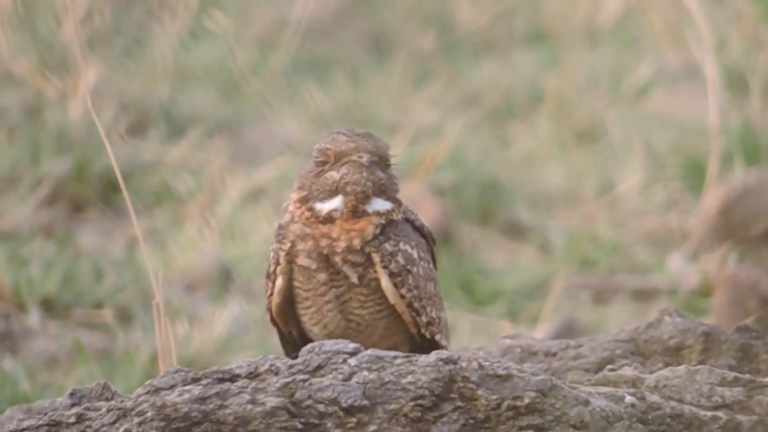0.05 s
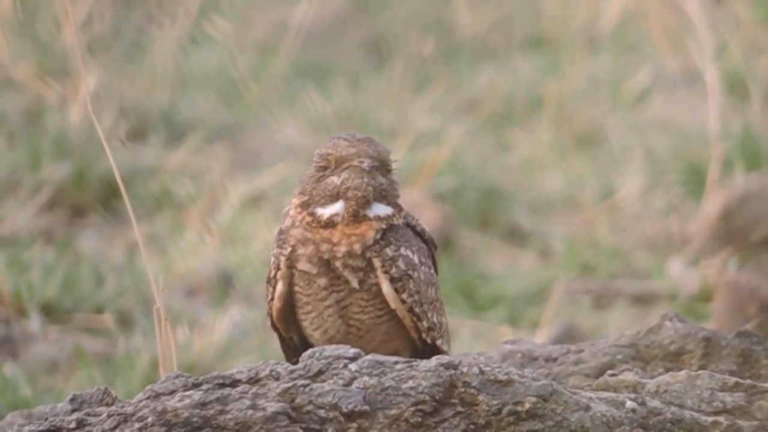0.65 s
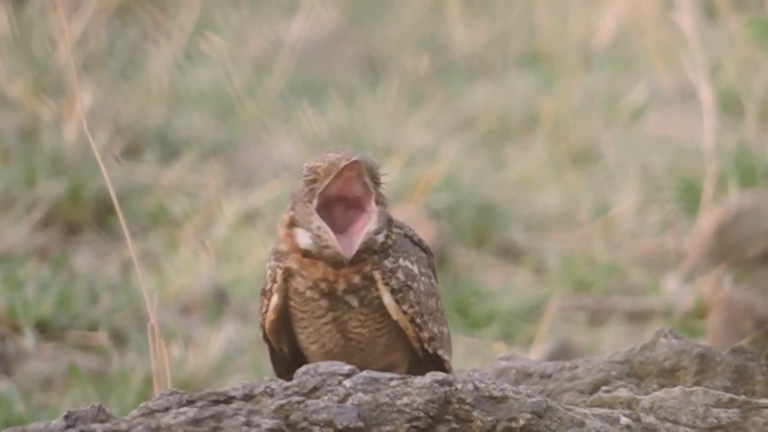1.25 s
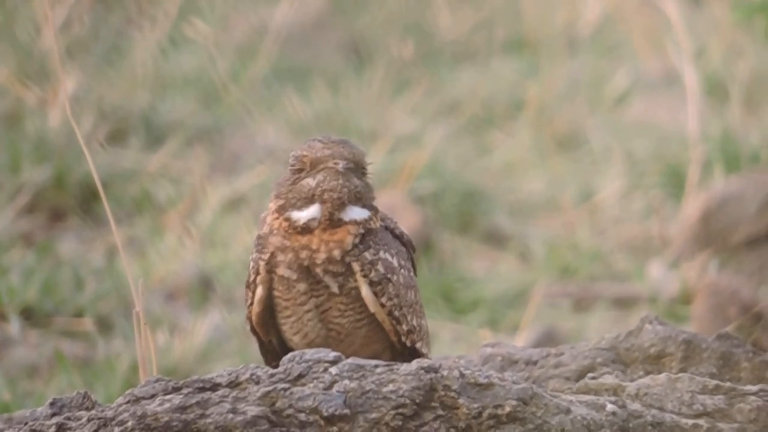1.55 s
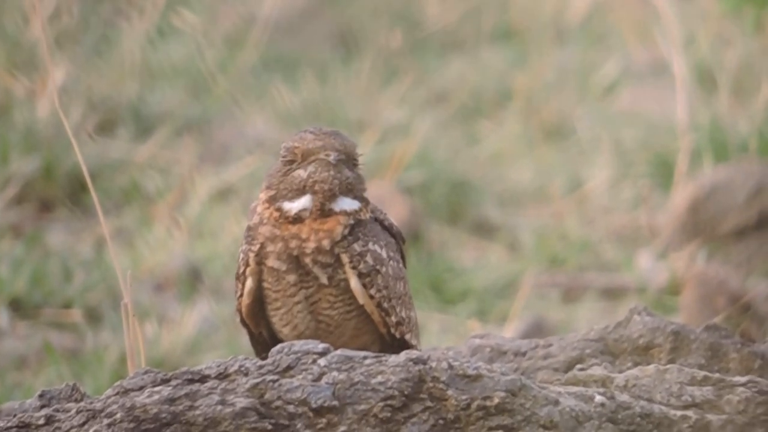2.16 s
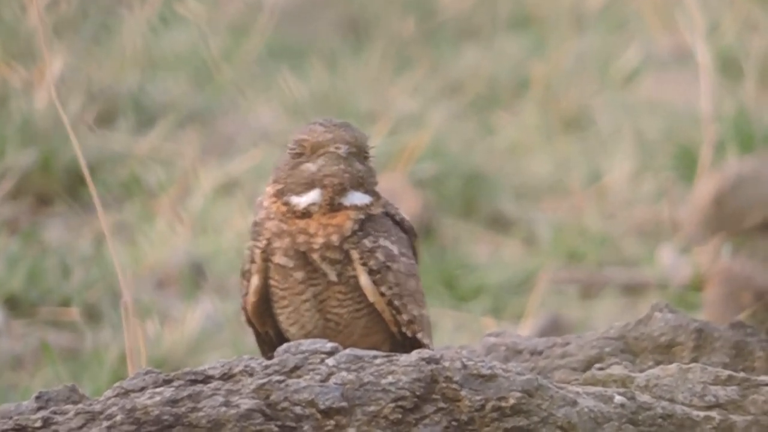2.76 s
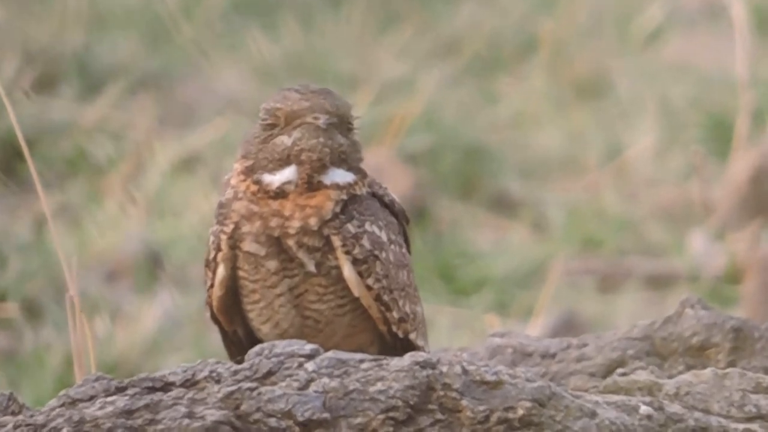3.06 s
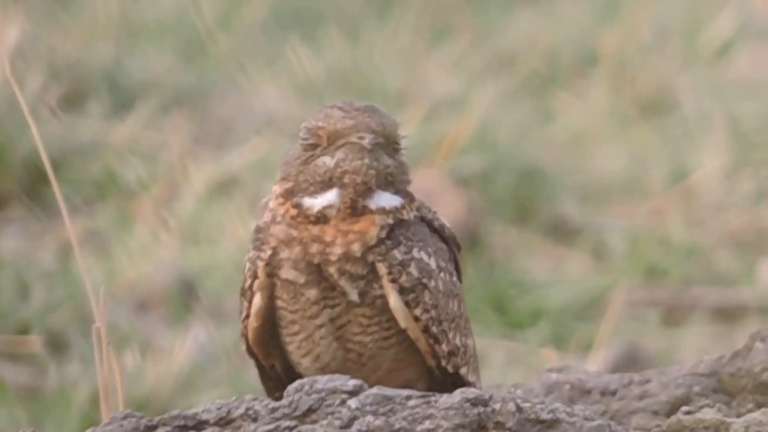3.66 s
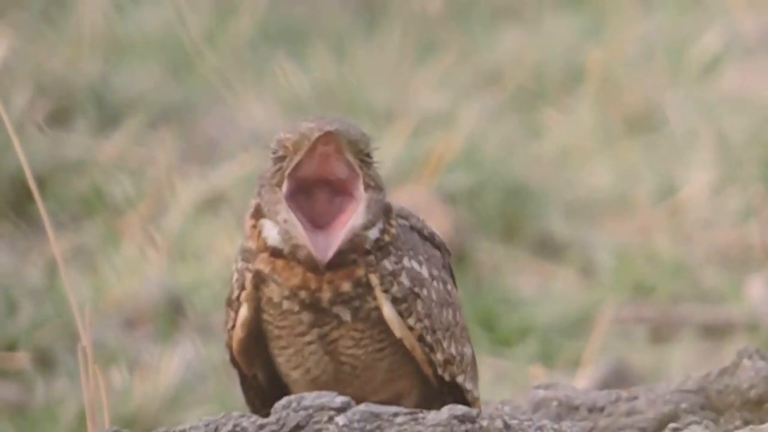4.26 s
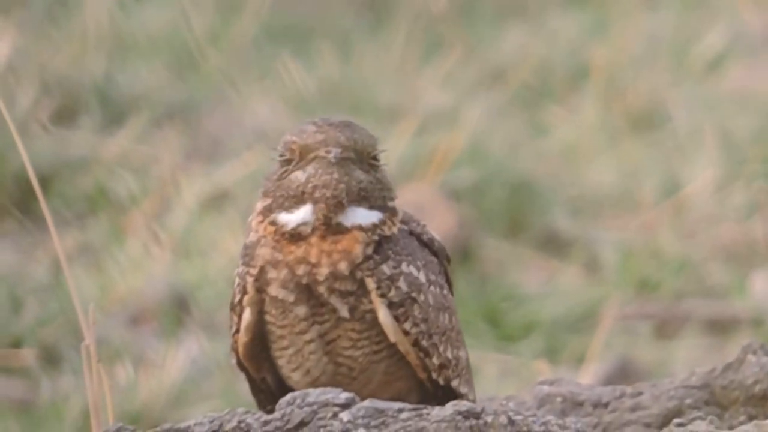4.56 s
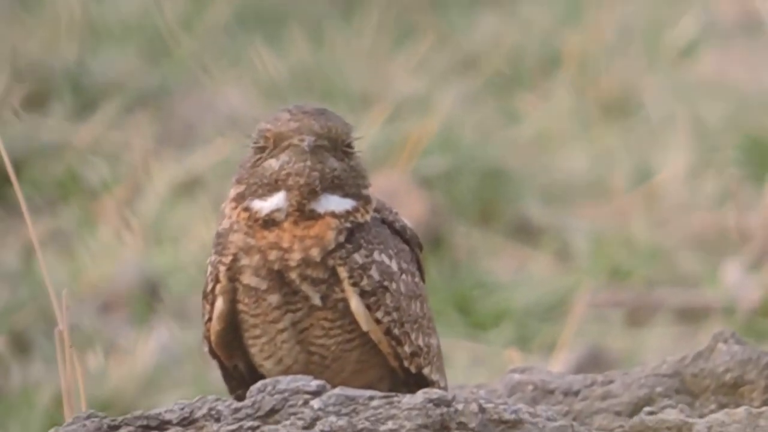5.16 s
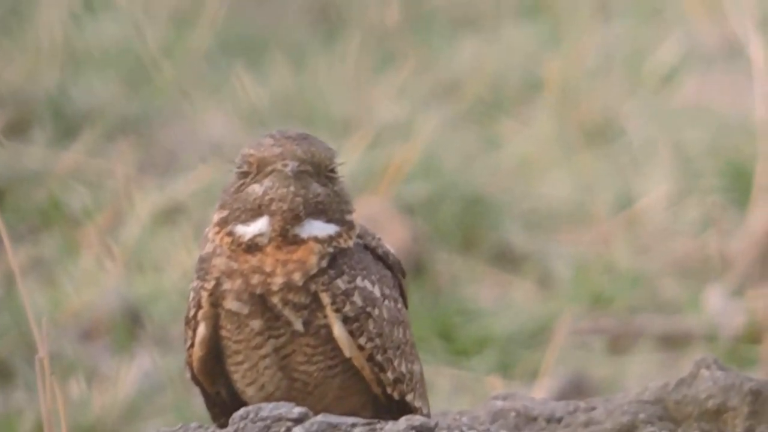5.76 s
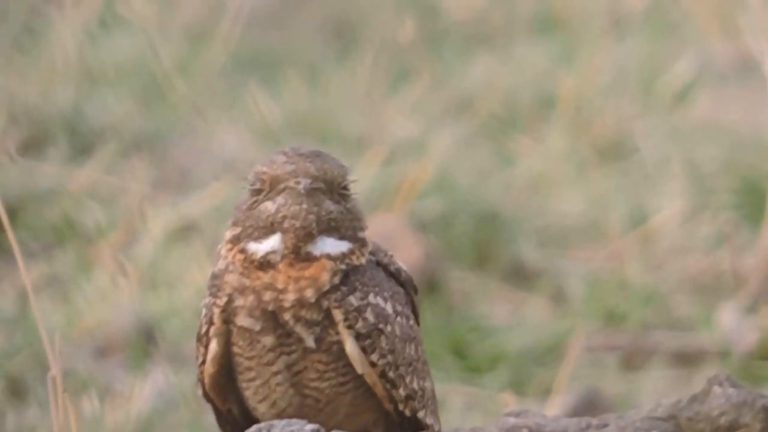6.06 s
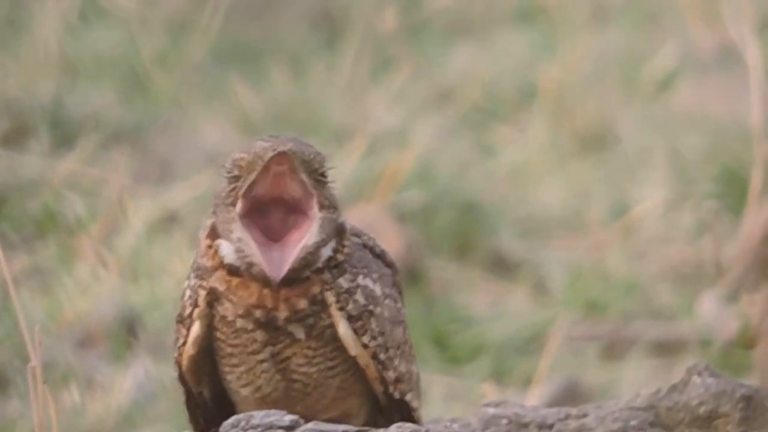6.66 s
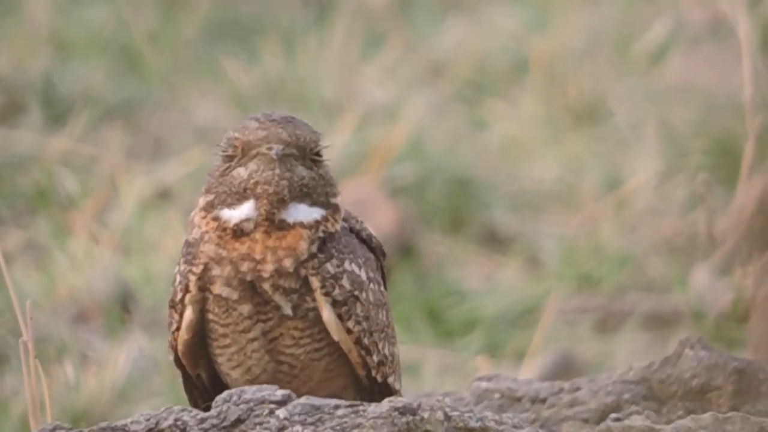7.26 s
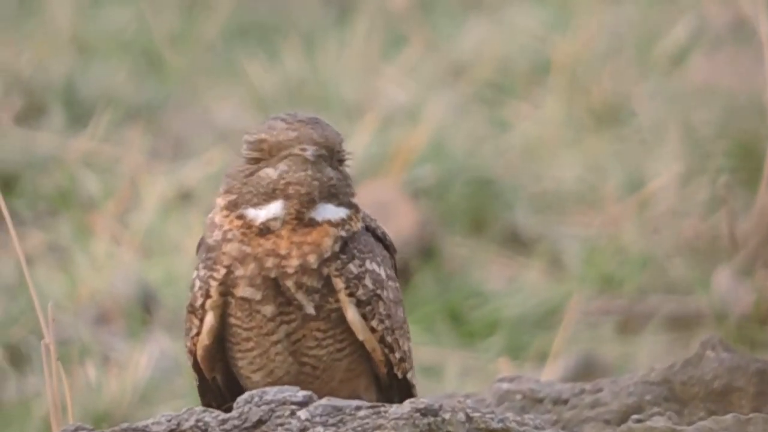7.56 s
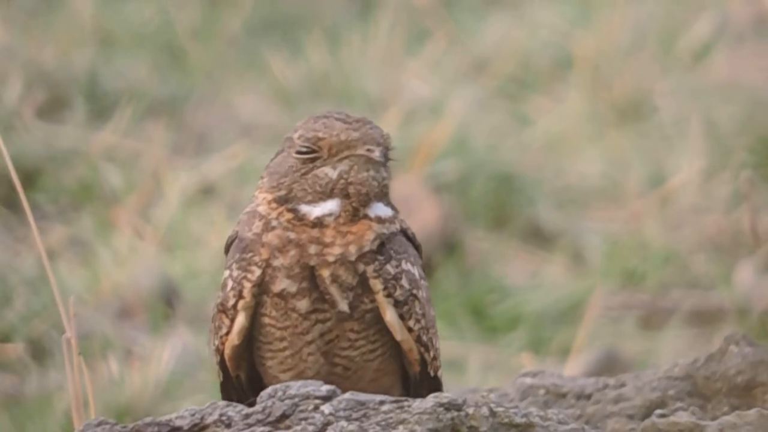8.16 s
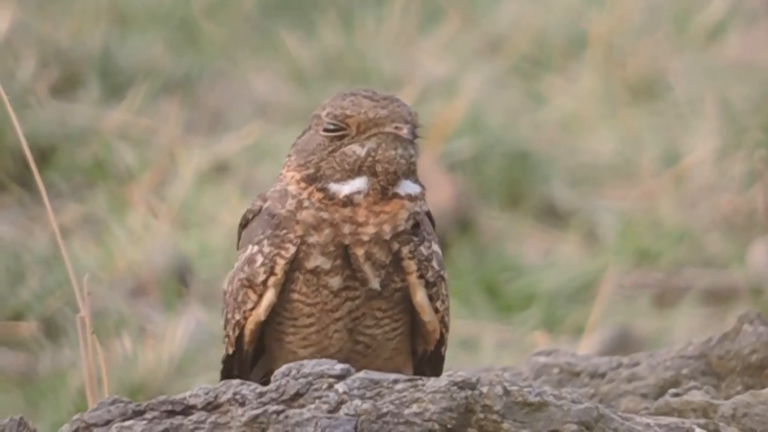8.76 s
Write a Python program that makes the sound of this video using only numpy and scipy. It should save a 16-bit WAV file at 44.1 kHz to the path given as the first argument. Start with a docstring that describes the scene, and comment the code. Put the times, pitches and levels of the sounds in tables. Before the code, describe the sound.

Two birds trade short, harsh trilled calls, one close and loud, one far off, while small birds chirp faintly in open country.

```python
"""Over the low rumble and thin hiss of open country, a far nightjar calls faintly and a near one on a
rock follows, loud and harsh; they trade three calls each. A call is one whistle shaken by a fast trill,
ending in a clean swoop. From about two seconds distant small birds chirp and buzz more busily, and just
after three something clicks close by. At the end a puff of wind swells into a low buffeting."""
import sys
import numpy as np
from scipy import signal
from scipy.fft import rfft, irfft
from scipy.io import wavfile
from scipy.ndimage import uniform_filter1d

SR = 44100
rng = np.random.default_rng(int(sys.argv[2]) if len(sys.argv) > 2 else 0)


def to_wav(s):
    """Save 16-bit WAV."""
    ch = np.atleast_2d(s).T  # columns
    pcm = np.round(np.clip(ch, -1, 1) * 32767)  # PCM
    wavfile.write(sys.argv[1], SR, pcm.astype(np.int16))


N = 396900
TIME = np.arange(N) / SR


def nightjar(calls, drive, overtones, opening, lag, gape_s, trill_hz, trill_depth, jitter_hz,
             hiss_db, throb, throb_lead, skew):
    """One whistle with overtones; a fast trill swings its pitch and loudness and makes it harsh."""
    out = np.zeros(N)
    for start, level_db, length, key_hz in calls:
        t = np.arange(0, length, 1 / SR)
        pitch, trilled = call_melody(t / length, opening, lag)
        centre_hz = key_hz * pitch
        depth_hz = trill_depth * centre_hz * trilled
        harsh = depth_hz / depth_hz.max()  # 0 in the clean swoop
        effort_db, bright_db = drive(t, centre_hz, trilled)
        trill = phase_of(trill_hz * (1 - .25 * t + .02 * wander(len(t), 60)))  # slows a little
        swing = np.sin(trill - skew * np.sin(trill))  # climbs more slowly than it falls
        hz = centre_hz + depth_hz * swing + jitter_hz * (.28 + harsh) * wander(len(t), 1500)
        phase = phase_of(hz)
        gape = np.minimum(t / gape_s, 1) ** 2  # the opening bill lets the top overtones out
        upper = np.zeros(len(t))
        for k, db in enumerate(overtones, 2):
            cut_db = 11 * np.maximum(5850 - k * hz, 0) / 1000  # the throat holds back low overtones
            upper += amp(db - cut_db) * gape ** (k - 2) * np.sin(k * phase) * (k * hz < SR / 2)
        upper *= amp(-.8 * harsh * swing)  # brightest at the bottom of each swing
        high_noise = signal.lfilter([1, -1], [1], rng.standard_normal(len(t)))
        hiss = high_noise * harsh * amp(hiss_db + .33 * bright_db)
        beat = 1 + throb * harsh * np.sin(trill + throb_lead)
        voice = np.sqrt(2) * beat * (np.sin(phase) + amp(bright_db) * upper + hiss)
        add(out, start, amp(level_db + effort_db) * voice * signal.windows.tukey(len(t), .012))
    return out


# The trilled scoop, then the clean swoop. Each row: share of the call, pitch as a ratio to the key.
SCOOP = [(.028, .83), (.085, .68), (.165, .595), (.36, 0.76), (.46, .812), (.72, .875)]
SWOOP = [(.72, 1.07), (.75, 1.132), (.782, 1.135), (.87, .752), (.9, .752), (.952, 1.04), (1.03, .9)]
def call_melody(u, opening, lag):
    """Opening note, scoop and swoop: the pitch relative to the key, and where it is trilled (0-1)."""
    scoop_at, scoop = np.transpose(SCOOP)
    swoop_at, swoop = np.transpose(SWOOP)
    turns = np.arange(len(swoop))
    turn = np.interp(u, swoop_at, turns)
    eased = np.floor(turn) + .5 - .5 * np.cos(np.pi * (turn % 1))  # lingers at each turning point
    trilled = (u >= scoop_at[0]) & (u < swoop_at[0])
    late = swoop_at[0] * (u / swoop_at[0]) ** lag  # a lag over 1 puts off the dip of the scoop
    pitch = np.where(trilled, np.interp(late, scoop_at, scoop), np.interp(eased, turns, swoop))
    pitch[u < scoop_at[0]] = opening
    return uniform_filter1d(pitch, size=110), uniform_filter1d(trilled * 1., size=110)


def push(t, centre_hz, trilled, full_hz, full_db, dull_db_per_khz, pure_db_per_khz, loud_db_per_khz,
         clean_db, onset_db, onset_bright_db, attack_s, release_db, release_s):
    """Effort and brightness in dB: the voice is richest at one pitch, duller below, purer above."""
    khz = (centre_hz - full_hz) / 1000
    onset = np.maximum(1 - t / attack_s, 0)
    ending = np.maximum(1 - (t[-1] - t) / release_s, 0)
    effort_db = loud_db_per_khz * khz + clean_db * (1 - trilled) + onset_db * onset + release_db * ending
    rich_db = full_db + dull_db_per_khz * np.minimum(khz, 0) - pure_db_per_khz * np.maximum(khz, 0)
    return effort_db, rich_db + onset_bright_db * onset


def near_push(t, centre_hz, trilled):
    """Swells quickly, holds and drops away at the very end; the clean notes are the brighter ones."""
    effort_db, bright_db = push(
        t, centre_hz, trilled, full_hz=3708, full_db=-2.5, dull_db_per_khz=21.5, pure_db_per_khz=4.5,
        loud_db_per_khz=-.2, clean_db=-1.5, onset_db=-7, onset_bright_db=8, attack_s=.02,
        release_db=-12, release_s=.006)
    return effort_db, bright_db + 4 * (1 - trilled)


# The lead calls. Each row: start in seconds, level in dB, length in seconds, key pitch in Hz.
NEAR_CALLS = [(1.2522, -22.5, .241, 4546), (4.2478, -21, .240, 4585), (6.6775, -22, .243, 4600)]
# The balance of the second, third and fourth harmonics in dB.
NEAR_OVERTONES = [1, -3, -13.5]
# The colour of throat and gape. Each row: frequency in Hz, gain in dB.
NEAR_THROAT = [(1200, -7), (2050, -8.5), (2500, -4.5), (3400, -5), (4000, 1), (4700, -5), (5200, -1),
               (5750, -3), (6450, -6), (8000, -5), (9200, -3), (11200, -5), (13000, -6), (15000, -18.5)]
# Peaks and dips on each side. Each row: centre in Hz, width in Hz, gain in dB.
LEFT_PEAKS = [(4022, 490, 13), (3380, 430, 5.5), (6000, 1900, 8.5), (8350, 200, -13.5), (10930, 1530, 13)]
RIGHT_PEAKS = [(5200, 490, 5.8), (3400, 230, 0.62), (9100, 1200, 1)]
def near_nightjar():
    """Faces the listener; rock and grass answer at once, the field faintly and for longer."""
    voice = nightjar(NEAR_CALLS, near_push, NEAR_OVERTONES, opening=.98, lag=.96, gape_s=.008,
                     trill_hz=198.3, trill_depth=.15, jitter_hz=36, hiss_db=-16.5,
                     throb=.22, throb_lead=-1.477, skew=.15)
    direct = np.array([colour(voice, NEAR_THROAT, peaks) for peaks in (LEFT_PEAKS, RIGHT_PEAKS)])
    spread = colour(voice, NEAR_THROAT)
    ground = scatter(spread, [(3000, .09), (12000, .094)], delay_s=.001)
    return direct + amp(-3) * ground + amp(-24) * field_echo(spread, delay_s=.02)


def far_push(t, centre_hz, trilled):
    """Grows louder as the pitch climbs and leans into the ending."""
    return push(t, centre_hz, trilled, full_hz=3630, full_db=-6.5, dull_db_per_khz=11,
                pure_db_per_khz=2, loud_db_per_khz=2, clean_db=-2, onset_db=-1, onset_bright_db=4,
                attack_s=.015, release_db=5, release_s=.022)


# The faint calls. Each row: start in seconds, level in dB, length in seconds, key pitch in Hz.
FAR_CALLS = [(0.6015, -36.5, 0.19, 4390), (2.8825, -38, 0.2, 4377), (5.8222, -39.5, .198, 4370)]
# The balance of the second, third and fourth harmonics in dB.
FAR_OVERTONES = [-2.5, -2, -16]
# A duller throat and gape. Each row: frequency in Hz, gain in dB.
FAR_THROAT = [(1200, -32), (2300, -3.5), (3200, -3), (4950, -2), (5350, -12), (6100, -0.5), (7200, -6.5),
              (9500, -3.5), (11000, -9.5), (13000, -33)]
def far_nightjar():
    """Off to the left, duller and more blurred by echoes."""
    voice = nightjar(FAR_CALLS, far_push, FAR_OVERTONES, opening=1.04, lag=1.16, gape_s=.011,
                     trill_hz=208.3, trill_depth=.18, jitter_hz=100, hiss_db=-26,
                     throb=.2, throb_lead=-1.05, skew=.25)
    voice = colour(voice, FAR_THROAT)
    direct = np.array([amp(5) * voice, amp(-1.5) * np.roll(voice, shift=6)])  # later on the right
    ground = scatter(voice, [(3000, .12), (12000, .25)], delay_s=.001)
    return direct + amp(-1.5) * ground + amp(-16) * field_echo(voice, delay_s=.024)


# Close clicks. Each row: start in seconds, level in dB, decay in seconds, ring send in dB.
CLICKS = [(3.0552, -24.5, 0.00042, -56), (3.221, -22.5, 0.00091, -16.5), (3.2227, -30, 0.0015, -36),
          (3.2438, -34, 0.0014, -20)]
# Their dull ring. Each row: frequency in Hz, gain in dB, seconds to fall 60 dB.
CLICK_MODES = [(390, -5, 0.054), (704, -9, 0.03), (914, 14.5, 0.011), (1220, 10.5, 0.007), (1690, -10, .02),
               (3670, -4, 0.019)]
# The tone of the crack. Each row: frequency in Hz, gain in dB.
CRACK_EQ = [(200, -11), (1000, 0), (4500, 2.5), (8000, 0.5), (12000, -7.5), (16000, -11)]
def clicks():
    """Each is a short crack of noise with a quickly damped ring, to the left."""
    t = TIME[:SR // 10]
    cracks, rings = np.zeros((2, N))
    body = sum(amp(db - 60 * t / t60) * np.sin(2 * np.pi * hz * t) for hz, db, t60 in CLICK_MODES)
    for start, db, decay, ring_db in CLICKS:
        add(cracks, start, amp(db) * np.exp(-t / decay) * rng.standard_normal(len(t)))
        add(rings, start, amp(db + ring_db) * body)
    direct = colour(cracks, CRACK_EQ) + rings
    echoes = scatter(direct, [(500, .05), (8000, .043)], delay_s=.001)
    return direct * amp([[3], [-5]]) + amp(-3) * echoes


def small_birds():
    """A chorus from across the field, leaning left and blurred by echoes."""
    chorus = np.zeros(N)
    for song in (buzzes, scratches, slurs, whistles, seees, peeps, churr_piks, twitter):
        for start, note in song():
            add(chorus, start, note)
    blur = scatter(chorus, [(2000, .052), (8000, .037)], delay_s=.003)
    echoes = amp(-1.5) * blur + amp(-9.5) * field_echo(chorus, delay_s=.037)
    return chorus * amp([[-.5], [-4.5]]) + echoes * amp([[1], [-1]])


def chirp(length, first_hz, middle_hz, last_hz, db, rasp_hz, flutter_hz=125):
    """A whistle on an arc of pitch; a fast, uneven flutter of the pitch turns it into a buzz."""
    u = np.linspace(0, 1, max(int(length * SR), 64))
    flutter = np.sin(phase_of(flutter_hz * (1 + .18 * wander(len(u), 60))))
    arc_hz = np.polyval(np.polyfit([0, .5, 1], [first_hz, middle_hz, last_hz], 2), u)
    hz = arc_hz + rasp_hz * (flutter + .595 * wander(len(u), 900))
    return amp(db) * np.sqrt(2) * np.sin(phase_of(hz)) * signal.windows.tukey(len(u), .35)


def crackly(length, first_hz, last_hz, db, spike_hz, spikes_per_s, crest, spread, fade_db):
    """A gliding whistle broken by a few sharp upward flicks of pitch, strongest at the crest."""
    u = np.linspace(0, 1, int(length * SR))
    turns = np.cumsum(spikes_per_s * (1 + .096 * wander(len(u), 80))) / SR + rng.random()
    flicks = (np.sin(np.pi * turns) ** 4 - .3) * np.exp(-((u - crest) / spread) ** 2)
    hz = first_hz + (last_hz - first_hz) * u + spike_hz * flicks
    envelope = amp(db + fade_db * abs(u - crest)) * signal.windows.tukey(len(u), .1)
    return envelope * np.sqrt(2) * np.sin(phase_of(hz))


# Each row: start of the pik in seconds, pik level in dB, churr level in dB, key pitch in Hz.
CHURR_PIKS = [(3.129, -52, -59, 2250), (4.143, -42.5, -54, 2500), (4.523, -47, -55.5, 2350),
              (4.699, -53.5, -59.5, 2200), (4.894, -56, -61, 2170), (5.199, -48, -57, 2216),
              (5.357, -44.5, -53, 2260), (5.522, -44.5, -52.5, 2260), (5.71, -44.5, -54, 2280)]
def churr_piks():
    """A falling, crackly churr runs into a short, sharp pik."""
    for start, pik_db, churr_db, hz in CHURR_PIKS:
        yield start - .073, crackly(.066, .94 * hz, .66 * hz, churr_db, spike_hz=850,
                                    spikes_per_s=130, crest=.408, spread=.26, fade_db=-9)
        yield start + .00096, crackly(.0198, 1.02 * hz, .97 * hz, pik_db, spike_hz=480,
                                      spikes_per_s=210, crest=.14, spread=.24, fade_db=-14.5)


# Each row: start in seconds, pitch in Hz, level in dB.
PEEPS = [(1.835, 2080, -60.5), (3.28, 2160, -57), (3.64, 2725, -56.5), (3.722, 2260, -55.5),
         (3.809, 2134, -53), (3.865, 2386, -55.5), (3.946, 2074, -53.5), (5.02, 2126, -54.5)]
def peeps():
    """Soft, arched peeps that lead up to the churr-piks."""
    for start, hz, db in PEEPS:
        yield start, chirp(.036, .92 * hz, hz, .976 * hz, db, rasp_hz=86.3)


# Each row: start in seconds, length in seconds, level in dB.
BUZZES = [(3.824, .125, -58.5), (4.153, 0.14, -54), (4.477, 0.12, -50.5), (4.745, 0.16, -51.5),
          (5.045, .135, -49.5), (8.778, 0.11, -59)]
def buzzes(hz=4850, rise=.05, tick_s=.011):
    """Rising buzzes, each ending in a tick."""
    top_hz = hz * (1 + rise)
    for start, length, db in BUZZES:
        yield start, chirp(length, hz * (1 - rise), hz, top_hz, db, rasp_hz=314)
        tick = chirp(tick_s, top_hz, 1.03 * top_hz, .915 * top_hz, db + 3, rasp_hz=115)
        yield start + length - tick_s / 2, tick


# Each row: start in seconds, length in seconds, pitch in Hz, level in dB.
SCRATCHES = [(2.416, .29, 2933, -64), (3.364, 0.089, 3830, -55), (3.365, .17, 5700, -62.5),
             (4.89, 0.2, 5400, -55), (4.875, 0.22, 3590, -62.5), (5.192, 0.11, 5570, -56),
             (6.277, .12, 3268, -59.5), (7.363, 0.18, 3670, -61), (7.963, 0.15, 5600, -65.5)]
def scratches(depth=.145):
    """Hoarse notes that flutter around a level pitch, with an airy octave on top."""
    for start, length, hz, db in SCRATCHES:
        yield start, chirp(length, hz, hz, hz, db, depth * hz, flutter_hz=92)
        yield start, chirp(length, 2 * hz, 2 * hz, 2 * hz, db - 14.5, 2 * depth * hz, flutter_hz=90)


# Each row: start and length in seconds, first and last pitch in Hz, level in dB.
SLURS = [(2.179, 0.038, 5670, 3610, -63.5), (3.527, .036, 4620, 3800, -58.5),
         (5.383, 0.062, 5840, 4470, -59.5), (6.405, 0.13, 3230, 2070, -60),
         (7.047, 0.086, 2000, 4600, -60.5), (7.195, .076, 1994, 4600, -62), (8.161, 0.083, 5870, 4470, -63),
         (8.9, 0.065, 4300, 2660, -62.5)]
def slurs():
    """Quick, husky slides up or down."""
    for start, length, first_hz, last_hz, db in SLURS:
        yield start, chirp(length, first_hz, np.sqrt(first_hz * last_hz), last_hz, db, rasp_hz=140)


# Each row: start and length in seconds, first, middle and last pitch in Hz, level in dB.
WHISTLES = [(0.0, 0.16, 1086, 1165, 1170, -66.5), (2.755, .072, 2210, 2770, 2940, -64),
            (4.021, .15, 4320, 4210, 3500, -58), (5.215, 0.13, 2800, 3150, 2600, -64),
            (5.64, .23, 880, 1200, 1030, -62.5), (7.654, .19, 3000, 3335, 3740, -59),
            (8.602, 0.076, 3020, 3540, 3110, -58), (8.938, .09, 538, 620, 640, -61)]
def whistles():
    """Clear notes on an arc of pitch."""
    for start, length, *arc_hz, db in WHISTLES:
        yield start, chirp(length, *arc_hz, db, rasp_hz=.011 * length)


# Each row: start in seconds, level in dB.
SEEES = [(2.196, -74), (3.72, -70), (7.25, -74.5)]
def seees():
    """One thin, high, rising "seee", repeated."""
    for start, db in SEEES:
        yield start, chirp(.23, first_hz=6700, middle_hz=7250, last_hz=7650, db=db, rasp_hz=45)


def twitter(per_s=1.7, low_hz=2320, high_hz=5300):
    """Very faint chirps at random times and pitches."""
    for when, height, bend in rng.random((round(per_s * N / SR), 3)):
        hz = low_hz * (high_hz / low_hz) ** height
        first_hz, last_hz = hz * (.87 + .33 * bend), hz * (1 - .22 * bend)
        yield when * N / SR, chirp(.05, first_hz, hz, last_hz, db=-68, rasp_hz=55)


# The closing swell of wind. Each row: time in seconds, level on the right in dB.
WIND_SWELL = [(8.4, -60.5), (8.65, -38), (8.85, -33.5), (9.0, -39)]
def breeze():
    """A puff of wind buffets the microphone, mostly on the right."""
    buffet_eq = [(10, -3), (35, 3.5), (80, 3), (160, -13), (300, -35.5), (800, -51), (3000, -65.5)]
    buffet = np.array([unit(colour(rng.standard_normal(N), buffet_eq)) for _ in range(2)])
    return buffet * amp([[-11], [0]]) * amp(np.interp(TIME, *np.transpose(WIND_SWELL)))


# The tone of the outdoor bed. Each row: frequency in Hz, relative level in dB.
AIR_EQ = [(12, -29.5), (20, -9.5), (60, 0), (241, -18.5), (301, -19), (328, -17), (357, -23), (976, -28.5),
          (1440, -32), (2080, -29.5), (2750, -32.5), (3440, -33.5), (3950, -34), (5530, -35.5),
          (16000, -48)]
# Its stereo width. Each row: frequency in Hz, left-right likeness from 0 to 1.
AIR_LIKENESS = [(60, 0.94), (150, 0.87), (380, 0.4), (950, 0.51), (2380, 0.22), (5980, 0.18), (15000, 0.77)]
# Its lean to the left. Each row: frequency in Hz, left minus right in dB.
AIR_BALANCE = [(60, 2.5), (150, 1.5), (380, 0.5), (950, 5.5), (2380, 1.0), (5980, 0.5), (15000, 0.5)]
def air():
    """Low rumble and thin hiss of open country, drifting a little, with a faint wavering hum."""
    hz = np.fft.rfftfreq(N, 1 / SR)
    left, other = rfft(rng.standard_normal((2, N)))
    likeness = np.clip(read(AIR_LIKENESS, hz), -1, 1)
    right = likeness * left + np.sqrt(1 - likeness ** 2) * other
    gain = amp(read(AIR_EQ, hz) + np.array([[.5], [-.5]]) * read(AIR_BALANCE, hz))
    bed = unit(irfft(np.array([left, right]) * gain, N))
    hum = np.sin(phase_of(331 + 3 * wander(N, 5.3))) * (1 + .86 * wander(N, 5))
    return amp(-47.5) * bed * amp(.5 * wander(N, 3.2)) + amp(-73) * hum


# The tail of the field. Each row: frequency in Hz, seconds to fall 60 dB.
FIELD_DECAY = [(500, 0.92), (3500, 0.93), (5000, 1), (7000, 0.69), (11000, 0.6), (16000, 0.7)]
def field_echo(x, delay_s):
    """The long scattered answer of the open field."""
    return scatter(x, FIELD_DECAY, delay_s)


def scatter(x, t60_points, delay_s):
    """Sparse echoes, different in each ear; each band dies by its (Hz, seconds to fall 60 dB) point."""
    taps = rng.standard_normal((2, SR)) * (rng.random((2, SR)) < .1) * (TIME[:SR] > delay_s)
    hz, t, bands = signal.stft(taps, SR, nperseg=256)
    decay = amp(-60 * t / read(t60_points, hz)[:, None])
    tail = signal.istft(bands * decay, SR, nperseg=256)[1]
    tail /= np.linalg.norm(tail, axis=1, keepdims=True)
    return signal.fftconvolve(x[None], tail, axes=1)[:, :N]


def colour(x, points, peaks=(), size=2048):
    """Causal EQ from (Hz, dB) points and bell-shaped peaks."""
    hz = abs(np.fft.fftfreq(size, 1 / SR))
    bells_db = sum(db * .5 ** ((2 * (hz - centre) / width) ** 2) for centre, width, db in peaks)
    log_gain = np.log(amp(read(points, hz) + bells_db))
    taps = np.fft.ifft(np.exp(signal.hilbert(log_gain).conj())).real
    return signal.oaconvolve(x, taps)[:N]


def wander(size, rate_hz):
    """Smooth random drift of rms 1, rolling off above the rate."""
    hz = np.fft.rfftfreq(size, 1 / SR)
    return unit(irfft(rfft(rng.standard_normal(size)) * np.exp(-(hz / rate_hz) ** 2), size))


def read(points, hz):
    """Reads a curve on a log-frequency axis."""
    point_hz, value = np.transpose(points)
    return np.interp(np.log(hz + 1), np.log(point_hz + 1), value)


def add(mix, start, sound):
    """Mixes a sound in at a start time in seconds."""
    part = mix[max(round(start * SR), 0):][:len(sound)]
    part += sound[:len(part)]


def phase_of(hz):
    """Running phase of a moving pitch."""
    return 2 * np.pi * np.cumsum(hz) / SR


def amp(db):
    """Turns dB into gain."""
    return 10 ** (np.asarray(db) / 20)


def unit(x):
    """Scales to rms 1."""
    return x / np.sqrt(np.mean(x ** 2) + 1e-20)


def scene():
    """Two nightjars over small birds, clicks, open air and wind."""
    return near_nightjar() + far_nightjar() + small_birds() + clicks() + air() + breeze()


def record(dry):
    """Cuts the treble steeply at 15.9 kHz."""
    lowpass = signal.firwin(511, 15900, window=("kaiser", 9), fs=SR)
    return signal.oaconvolve(dry, lowpass[None], "same")


dry = scene()
out = record(dry)
to_wav(out)
```